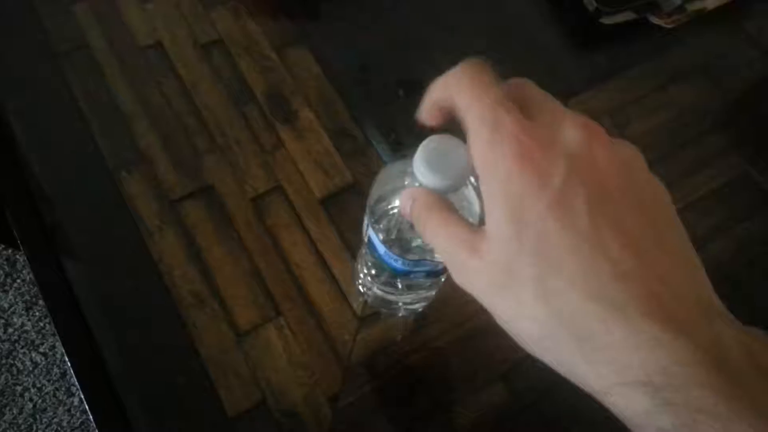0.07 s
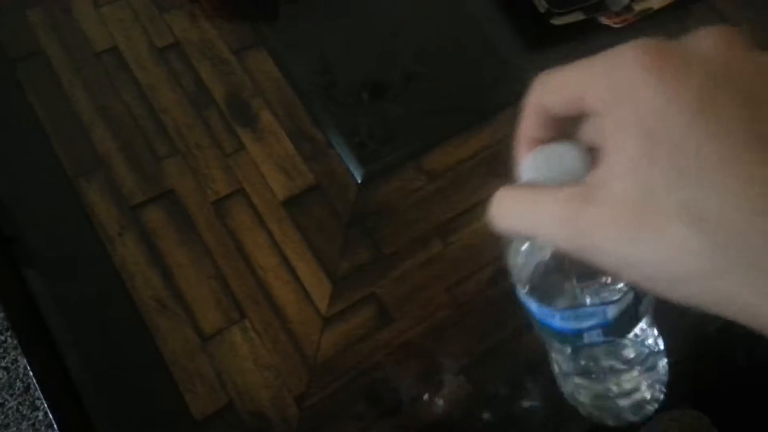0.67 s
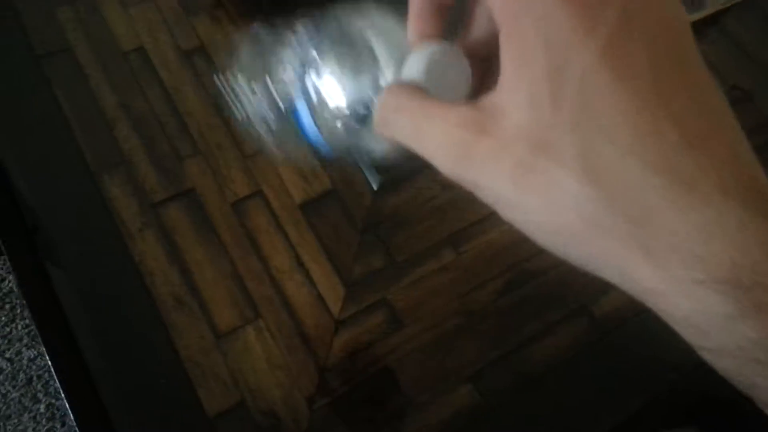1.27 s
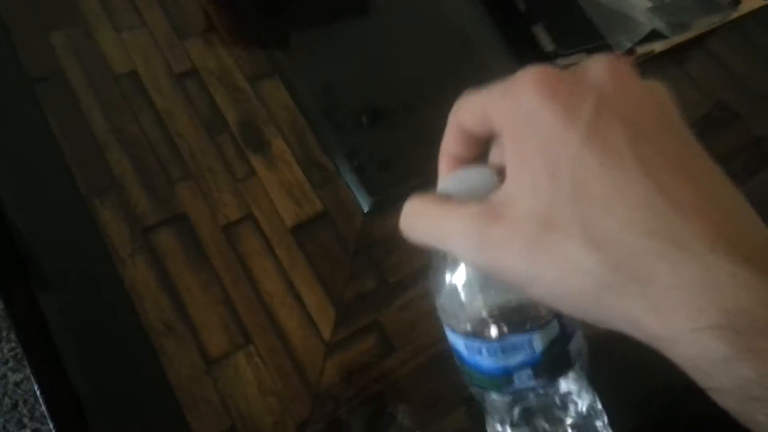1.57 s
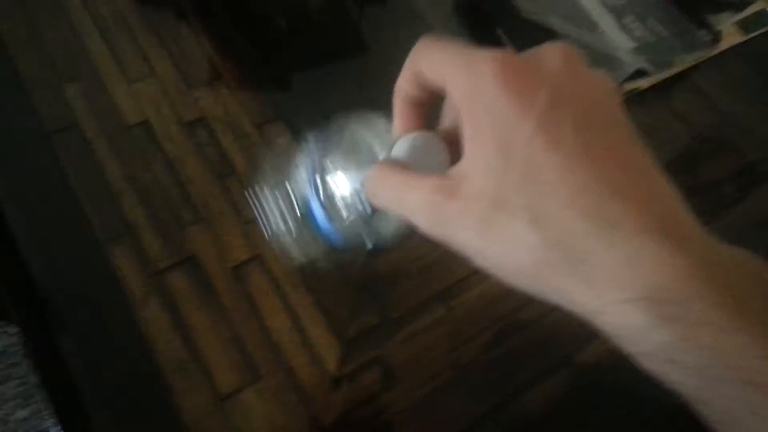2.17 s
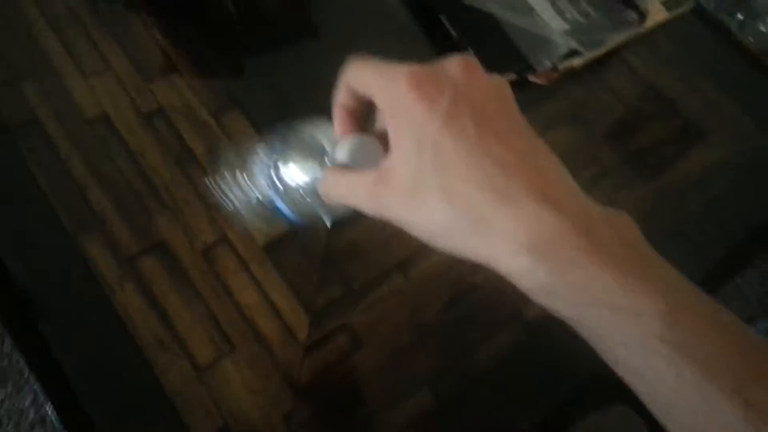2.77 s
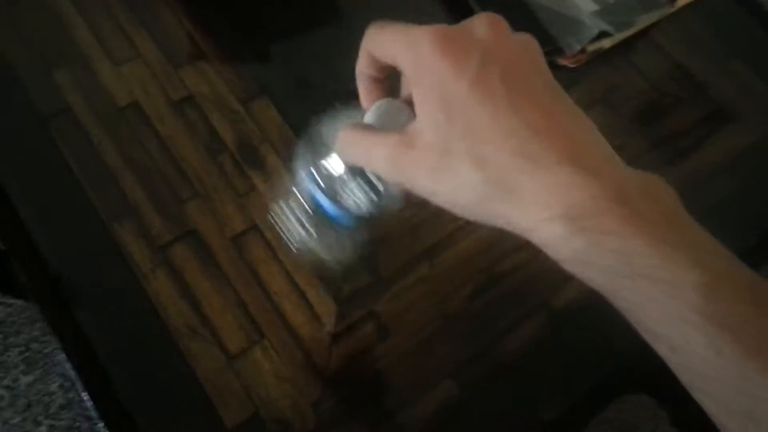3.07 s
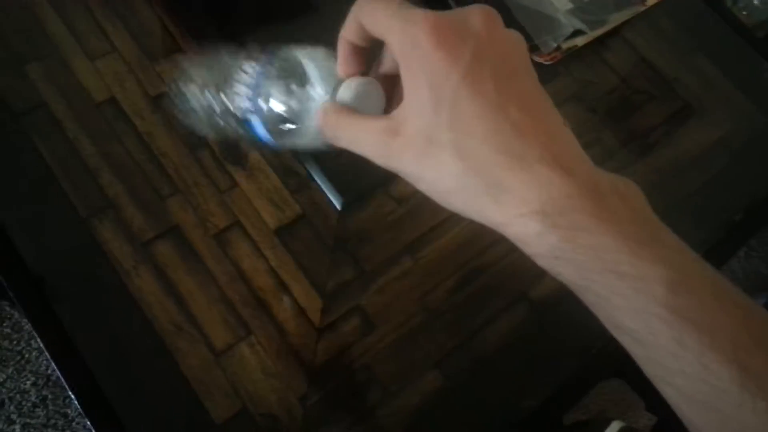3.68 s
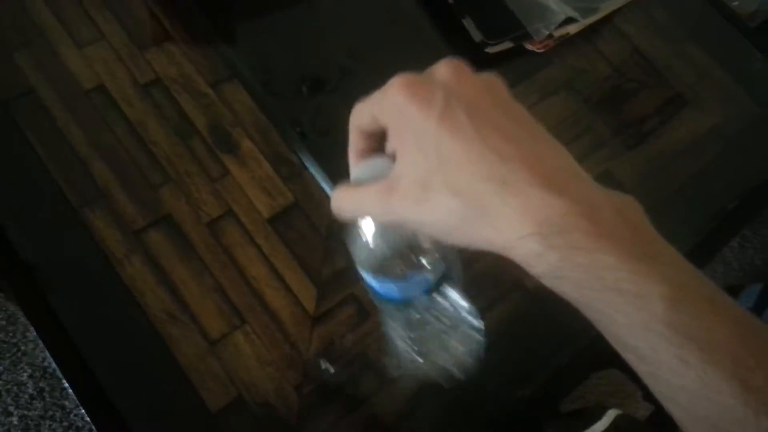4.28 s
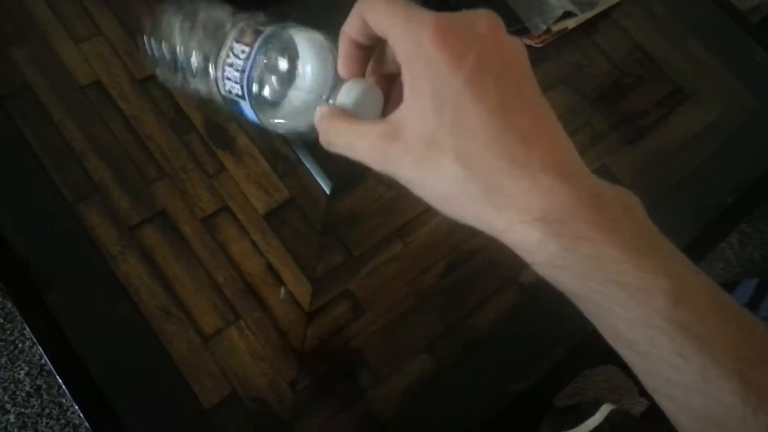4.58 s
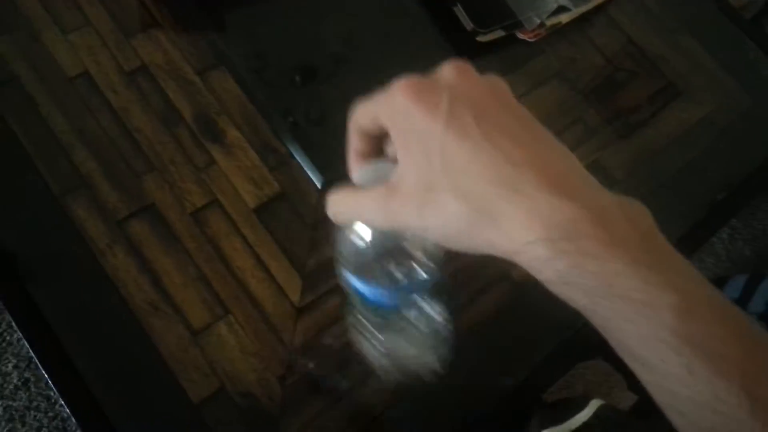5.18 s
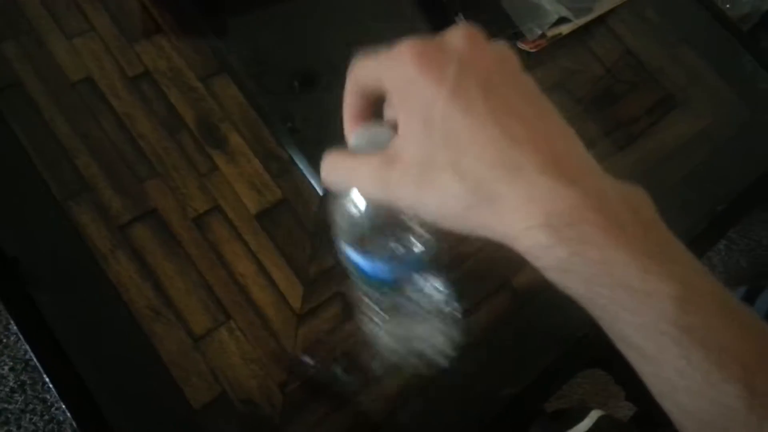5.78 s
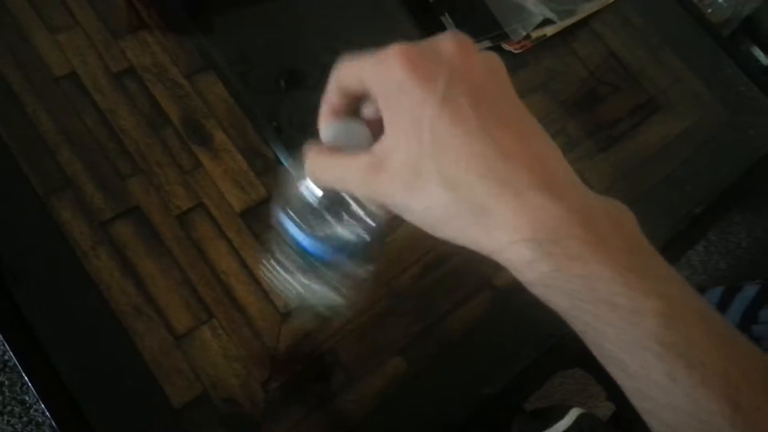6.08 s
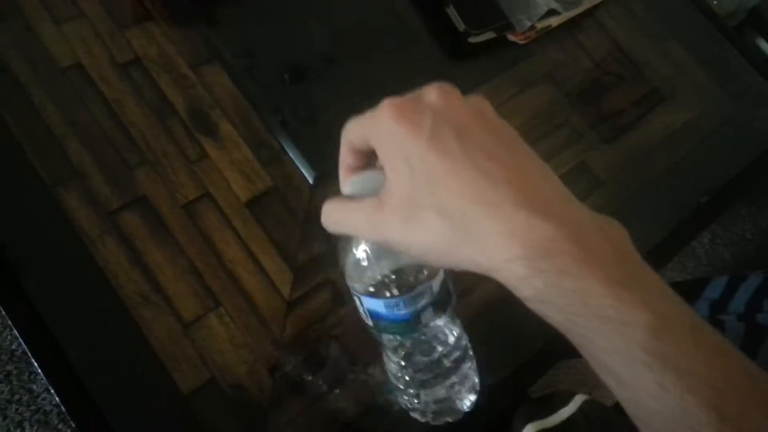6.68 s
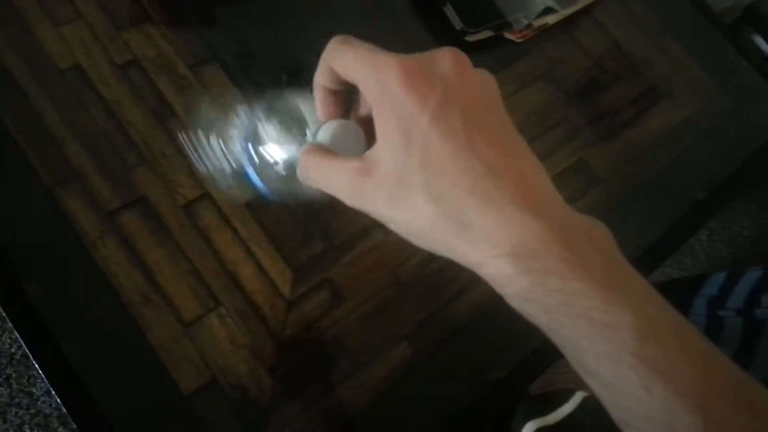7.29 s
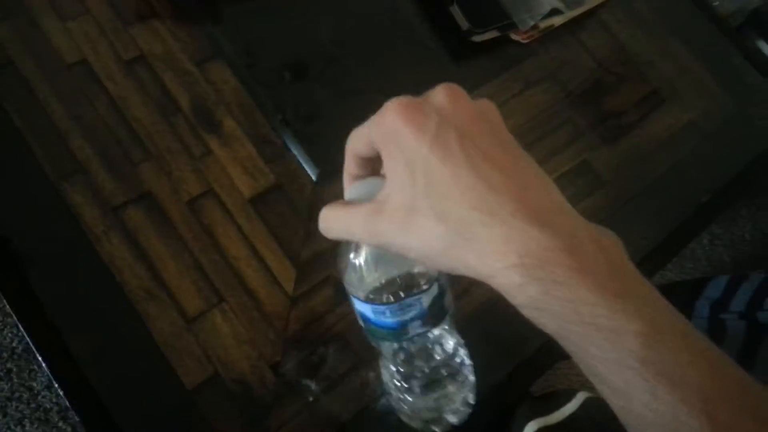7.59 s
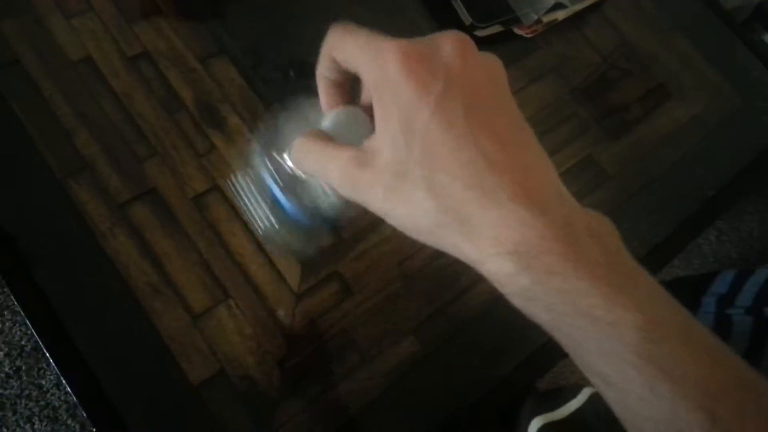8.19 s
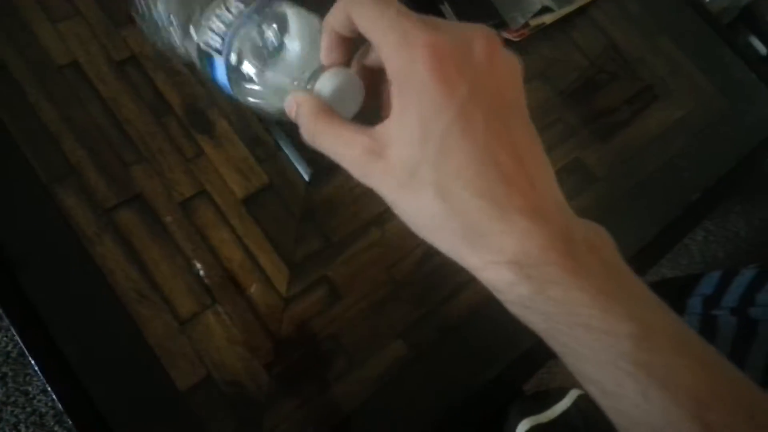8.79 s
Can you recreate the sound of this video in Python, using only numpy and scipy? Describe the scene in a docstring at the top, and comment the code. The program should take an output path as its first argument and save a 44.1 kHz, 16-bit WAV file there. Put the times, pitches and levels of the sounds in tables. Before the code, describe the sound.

A small amount of water sloshes in a thin plastic bottle as it swings back and forth, making soft, irregular plips and a faint trickling gurgle. The plastic ticks lightly now and then. Near the end the bottle takes one hard, hollow knock, much louder than the rest. The room is quiet and slightly echoing, with a fan's low hum and steady microphone hiss throughout.

```python
"""Water in a swinging bottle

A little water sloshes in a thin plastic bottle that swings by its cap in a quiet, live room.
Trapped bubbles ring as soft plips over a fan's throbbing hum and the microphone's hiss, and
the swinging arm stirs low puffs of air. The plastic ticks now and then, and at the end the
bottle takes a hard, hollow knock that rings its shell."""
import sys
import numpy as np
from scipy import signal
from scipy.fft import rfft, irfft
from scipy.io import wavfile
from scipy.ndimage import uniform_filter1d

SR = 44100
rng = np.random.default_rng(int(sys.argv[2]) if len(sys.argv) > 2 else 0)


def wav_record(signal):
    """Record a signal, one row per channel, as 16-bit PCM in the file named by sys.argv[1]."""
    frames = np.transpose(np.atleast_2d(signal))
    bounded = np.clip(frames, -1, 1)
    # unit amplitude maps onto the largest positive 16-bit level
    quanta = np.round(bounded * 32767).astype(np.int16)
    wavfile.write(sys.argv[1], SR, quanta)


N = 398663
START_S = .818  # the microphone opens

# The colour of the room tone. Each row: frequency in Hz, relative level in dB.
AIR_SPECTRUM = [(15, -51), (25, -8), (49, -34), (108, -5), (179, -5.5), (240, -2), (368, -4.5), (520, -7),
                (610, -12), (910, -15), (4260, -25), (6350, -30), (10500, -28), (13400, -28.5),
                (14500, -31.5)]
# How alike the room tone is left and right. Each row: frequency in Hz, correlation from 0 to 1.
AIR_LIKENESS = [(30, 0.5), (80, 0.71), (200, 0.74), (400, 0.72), (800, 0.27), (2000, 0), (4000, 0),
                (8000, 0)]
# The fan's weaker lines and a thin whine. Each row: pitch in Hz, level in dB, phase waver in radians.
HUM_LINES = [(58.7, -77.5, .6), (118.8, -64, 0.95), (158.8, -69, 0.78), (207, -71.5, 1.2), (10201, -92, .2)]
# The fader curve of the fan's main tone. Each row: time in seconds, relative level in dB.
DRONE_FADER = [(.85, -60.5), (1.6, -58), (2.5, -66.5), (3.2, -55.5), (5.7, -59.5), (6.4, -65), (7.5, -56),
               (8.9, -62)]
# Air stirred by the arm. Each row: time of the crest in seconds, level in dB.
ARM_PUFFS = [(1.75, -63), (3.77, -69), (5.5, -74), (6.2, -68)]
# Ticks of spray and plastic. Each row: start in seconds, band centre in Hz, relative level in dB.
CRISP_TICKS = [(1.285, 8500, -64), (1.635, 5500, -62), (2.392, 11000, -58.5), (2.671, 2800, -67),
               (3.32, 4800, -66), (3.465, 6000, -62), (6.70, 8000, -63), (6.956, 3800, -61)]
# Blows on the bottle. Each row: start in seconds, level in dB.
BLOWS = [(8.976, -43), (8.9815, -32), (9.002, -42.5), (9.034, -42)]
# The modes of the shell. Each row: pitch in Hz, relative level in dB, seconds to fall by 60 dB.
SHELL_MODES = [(306, -7.5, 0.026), (465, -0.5, 0.018), (813, -1, 0.047), (1210, -3, 0.022),
               (1400, 0, 0.018), (1716, 3.5, 0.026), (2120, 3, 0.016), (2560, -3, 0.028), (3330, -23, .02),
               (4290, -13.5, 0.034), (5700, -15.5, 0.06), (7650, -30, .03)]
# Where bubbles sit in the stereo image. Each row: pitch in Hz, left minus right in dB.
BUBBLE_PAN = [(1100, -2), (1350, -4.5), (1700, -6.5), (2100, -7), (3000, 0), (4500, -3)]
# The bubbles that stand out. Each row: cue in seconds, pitch in Hz, relative level in dB,
# splash as a share of the ring.
LEAD_BUBBLES = [(0.834, 3130, -63, 0.64), (0.851, 1920, -57, 0.53), (0.923, 4500, -63, 0.45),
                (1.234, 2310, -60.5, .45), (1.488, 3100, -54.5, 0.42), (1.677, 1530, -59, 0.71),
                (1.826, 3160, -57, .2), (2.397, 3030, -57.5, .35), (2.677, 1120, -51.5, 1),
                (3.08, 2790, -57, .2), (3.199, 1720, -55.5, 0.28), (3.32, 3050, -54.5, .4),
                (3.464, 2060, -57.5, .55), (3.639, 1760, -54.5, .45), (3.728, 1260, -56.5, .6),
                (3.85, 1630, -61, .2), (4.148, 1350, -49, .35), (4.152, 1610, -51, .3),
                (4.453, 2610, -62, .3), (4.497, 3030, -60.5, .5), (4.556, 1620, -57, 0.51),
                (4.768, 1150, -57.5, 0.58), (5.033, 1330, -57, .35), (5.197, 1360, -55, 0.51),
                (5.302, 2150, -55, 0.58), (5.504, 1900, -59, .8), (5.63, 1400, -60, 1),
                (5.801, 1355, -57.5, 0.45), (6.06, 2520, -61, 0.4), (6.2, 3470, -59, .8),
                (6.302, 997, -57, .2), (6.52, 2640, -58.5, .65), (6.655, 1660, -53, .2),
                (6.82, 2380, -61, .3), (6.962, 2030, -55.5, 0.86), (7.255, 2510, -54, 0.38),
                (7.525, 1720, -60, 0.6), (7.684, 1600, -54.5, .2), (7.924, 1710, -56, .2),
                (8.027, 1640, -61, .2), (8.138, 1627, -47, 0.28), (8.236, 1285, -51, 0.64),
                (8.755, 3080, -61.5, .5), (8.916, 1780, -49.5, 0.46)]


def gain_of(db):
    """Decibels to amplitude."""
    return 10 ** (np.asarray(db) / 20)


def unit_rms(x):
    """Scales a signal to rms 1."""
    return x / np.sqrt(np.mean(x ** 2) + 1e-20)


def curve_at(points, hz):
    """Reads a curve on a log-frequency axis."""
    freqs, values = np.transpose(points)
    return np.interp(np.log(hz + 1), np.log(freqs + 1), values)


def add(mix, start_s, sound):
    """Drops a stereo sound into the mix."""
    part = mix[:, max(round(start_s * SR), 0):][:, :sound.shape[1]]
    part += sound[:, :part.shape[1]]


def drift(rate_hz):
    """Slow random wandering of rms 1."""
    hz = np.fft.rfftfreq(N, 1 / SR)
    return unit_rms(irfft(rfft(rng.standard_normal(N)) / (1 + (hz / rate_hz) ** 4), N))


def burst(low_hz, high_hz, decay_s):
    """A dying burst of band-limited noise with unit energy."""
    t = np.arange(SR // 20) / SR
    band = signal.butter(2, [low_hz, min(high_hz, SR / 2 - 100)], "band", fs=SR)
    noise = signal.lfilter(*band, rng.standard_normal(len(t)) * np.exp(-t / decay_s))
    return noise / np.linalg.norm(noise)


def in_room(sound, direct, early, early_s, t60):
    """Direct sound, a cluster of near reflections and a diffuse tail; the first 40 ms have rms 1."""
    t = np.arange(SR // 2) / SR
    echoes = rng.standard_normal((2, len(t)))
    echoes = echoes + 0.12 * echoes[::-1]  # left and right share some echoes
    cluster = early * t / early_s * np.exp(1 - t / early_s)
    tail = gain_of(-60 * t / t60) * (1 - np.exp(-t / 0.012))
    response = echoes * (cluster + tail)
    response /= np.linalg.norm(response[0])
    response[:, 0] += direct
    heard = signal.fftconvolve(sound[None], response, axes=1)
    return heard / np.sqrt(np.mean(heard[:, :SR // 25] ** 2, axis=1, keepdims=True))


def room_tone(level_db=-51.5, shimmer_db=1.17):
    """The bed: near-centred fan rumble under wide microphone hiss, its colour shimmering slightly."""
    frames, hz = N // 512 + 5, np.fft.rfftfreq(2048, 1 / SR)
    left_re, left_im, side_re, side_im, shimmer = rng.standard_normal((5, frames, len(hz)))
    shimmer = uniform_filter1d(shimmer, size=10, axis=0)  # smooth in time
    shimmer = unit_rms(uniform_filter1d(shimmer, size=12, axis=1))  # and in frequency
    likeness = curve_at(AIR_LIKENESS, hz)
    left = left_re + 1j * left_im
    right = likeness * left + np.sqrt(1 - likeness ** 2) * (side_re + 1j * side_im)
    spectra = np.array([left, right]) * gain_of(curve_at(AIR_SPECTRUM, hz) + shimmer_db * shimmer)
    _, noise = signal.istft(spectra.transpose(0, 2, 1), nperseg=2048, noverlap=1536)
    return gain_of(level_db) * unit_rms(noise[:, :N])


def fan_hum(drone_hz=235.9, trim_db=-2.0, throb_db=3, throb_s=0.802, crest_s=4.815, swell_db=1.7):
    """Wavering motor lines, the main one throbbing evenly, and a faint electronic whine."""
    t = np.arange(N) / SR

    def tone(hz, waver):
        """One unsteady line of rms 1."""
        swell = gain_of(swell_db * drift(5.4))
        return unit_rms(swell * np.sin(2 * np.pi * hz * t + waver * drift(4.3)))

    fader_db = np.interp(t, *np.transpose(DRONE_FADER))
    pulse_db = throb_db * np.cos(2 * np.pi * (t - crest_s) / throb_s)
    drone = gain_of(fader_db + pulse_db + trim_db) * tone(drone_hz, waver=1.43)
    return drone + sum(gain_of(db) * tone(hz, waver) for hz, db, waver in HUM_LINES)


def arm_puffs(width_s=0.051):
    """The swinging arm pushes soft, low swells of air at the microphone."""
    t = np.arange(N) / SR
    band = signal.butter(2, [45, 85], "band", fs=SR, output="sos")
    rumble = unit_rms(signal.sosfilt(band, rng.standard_normal(N)))
    return rumble * sum(gain_of(db) * np.exp(-((t - s) / width_s) ** 2 / 2) for s, db in ARM_PUFFS)


def ticks(decay_s=0.0071, trim_db=-5):
    """Spray and thin plastic give brief, crisp crackles."""
    out = np.zeros((2, N))
    for start_s, hz, db in CRISP_TICKS:
        crackle = burst(hz * 0.77, hz * 1.26, decay_s)
        heard = in_room(crackle, direct=0.33, early=1.0, early_s=0.0045, t60=0.35)
        add(out, start_s, gain_of(db + trim_db) * heard)
    return out


def knocks(right_db=1.4, crunch_db=-4):
    """Each blow crunches the thin plastic, rings the shell and wakes the room."""
    out, t = np.zeros((2, N)), np.arange(SR // 20) / SR
    for start_s, db in BLOWS:
        body = 0
        for hz, mode_db, t60 in SHELL_MODES:
            mode = np.sin(2 * np.pi * hz * t) * gain_of(-60 * t / t60) * (1 - np.exp(-t * hz))
            body += gain_of(mode_db) * in_room(mode, direct=0.36, early=2.5, early_s=0.0021, t60=0.36)
        body /= np.linalg.norm(gain_of([mode_db for _, mode_db, _ in SHELL_MODES]))
        crunch = burst(1010, 2340, decay_s=0.0041)
        crunch = in_room(crunch, direct=0.41, early=1.4, early_s=0.0038, t60=0.45)
        add(out, start_s, gain_of(db) * (body + gain_of(crunch_db) * crunch))
    return out * gain_of([[-right_db], [right_db]])


def bubble(hz, cycles, rise, splash):
    """A trapped bubble rings for some cycles, its pitch creeping up, inside the splash that made it."""
    t = np.arange(SR // 20) / SR
    age = t * hz / cycles
    glide_hz = hz * (1 + rise * (np.tanh(age) - .5))
    envelope = (1 - np.exp(-t / 0.00034)) * np.exp(-age)
    ring = envelope * np.sin(2 * np.pi * np.cumsum(glide_hz) / SR)
    return ring / np.linalg.norm(ring) + splash * burst(hz * 0.44, hz * 1.61, decay_s=0.015)


def pan(hz):
    """Left and right gains for a bubble of this pitch."""
    return gain_of(curve_at(BUBBLE_PAN, hz) * np.array([[1], [-1]]) / 2)


def trickle(level_db=-69, spread_db=3, tilt_db=-8, low_hz=850, high_hz=4500, count=130):
    """Many tiny bubbles as the water runs along the ribbed wall; the smallest are the faintest."""
    out = np.zeros((2, N))
    for when, height, force in rng.random((count, 3)):
        ring = bubble(low_hz * (high_hz / low_hz) ** height, cycles=6.3, rise=.1, splash=0.46)
        gain = gain_of(level_db + spread_db * (2 * force - 0.5) + tilt_db * height)
        start_s = START_S + when * (N / SR - START_S)
        add(out, start_s, gain * in_room(ring, direct=0.12, early=1.2, early_s=0.0034, t60=0.28))
    return out


def gurgle(level_db=-62.5, spread_db=2, tilt_db=-6, low_hz=1400, high_hz=4800, count=40):
    """Moving water traps a loose string of small bubbles; the higher, the fainter."""
    out = np.zeros((2, N))
    for slot, (late, height, force) in enumerate(rng.random((count, 3))):
        hz = low_hz * (high_hz / low_hz) ** height
        gain = gain_of(level_db + spread_db * (2 * force - 1) + tilt_db * height) * pan(hz)
        ring = bubble(hz, cycles=5.9, rise=0.077, splash=.6)
        start_s = START_S + (slot + late) / count * (N / SR - START_S)
        add(out, start_s, gain * in_room(ring, direct=0.14, early=1.0, early_s=0.0082, t60=0.34))
    return out


def plips(trim_db=-1, lead_s=.006, shed_db=-12, shed_within_s=.07, near_above_db=-57):
    """The larger bubbles, each shedding a fainter one; the louder ones are nearer and so sound drier."""
    out = np.zeros((2, N))
    for (cue_s, hz, db, splash), (late, height) in zip(LEAD_BUBBLES, rng.random((len(LEAD_BUBBLES), 2))):
        gain = gain_of(db + trim_db) * pan(hz)
        near = gain_of(0.53 * max(db - near_above_db, 0))
        ring = bubble(hz, cycles=6.6, rise=0.048, splash=splash)
        ring = in_room(ring, direct=0.23 * near, early=0.97 * near, early_s=0.0056, t60=0.45)
        add(out, cue_s - lead_s, gain * ring)
        shed_octaves = 0.49 * (2 * height - .7)
        shed = bubble(hz * 2 ** shed_octaves, cycles=4.9, rise=0.074, splash=0.4)
        shed = in_room(shed, direct=0.35, early=1.4, early_s=0.0063, t60=.35)
        add(out, cue_s + shed_within_s * late, gain / near * gain_of(shed_db) * shed)
    return out


def scene():
    """The bottle a little to the right, over the room's steady bed."""
    return plips() + gurgle() + trickle() + ticks() + knocks() + arm_puffs() + room_tone() + fan_hum()


def record(dry, fade_s=.003, cutoff_hz=14600):
    """The microphone opens after a moment of silence; a steep low-pass trims the very top."""
    fade_in = np.clip((np.arange(N) / SR - START_S) / fade_s, 0, 1)
    low_pass = signal.firwin(511, cutoff_hz, window=("kaiser", 9), fs=SR)
    return signal.oaconvolve(dry * fade_in, low_pass[None], "same")


dry = scene()
out = record(dry)
wav_record(out)
```